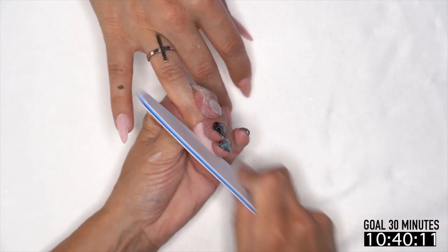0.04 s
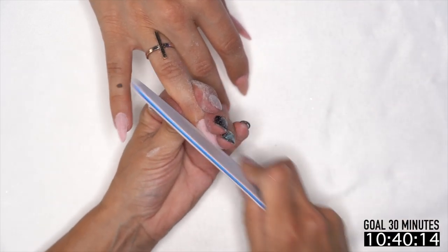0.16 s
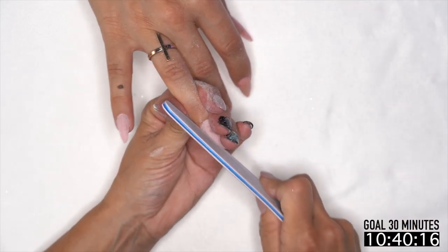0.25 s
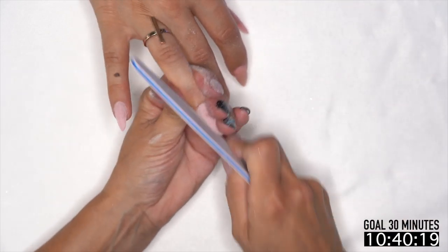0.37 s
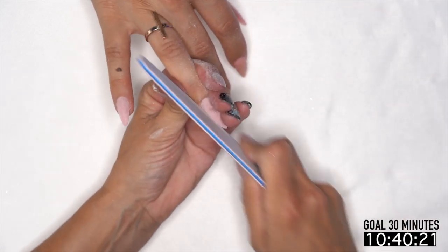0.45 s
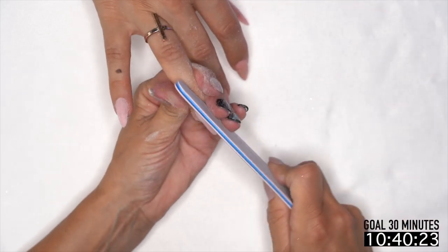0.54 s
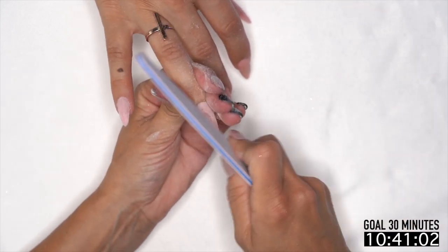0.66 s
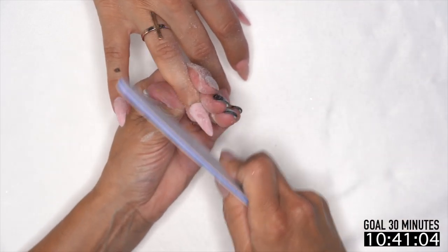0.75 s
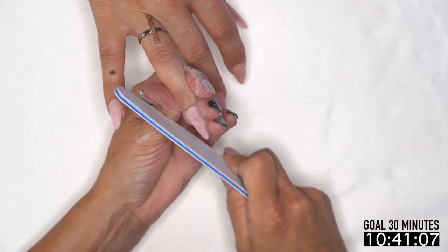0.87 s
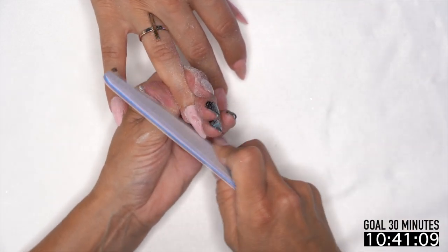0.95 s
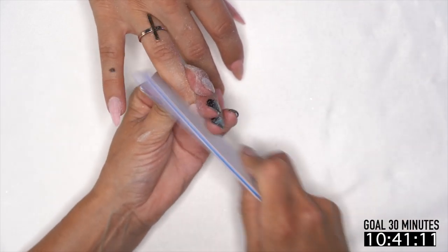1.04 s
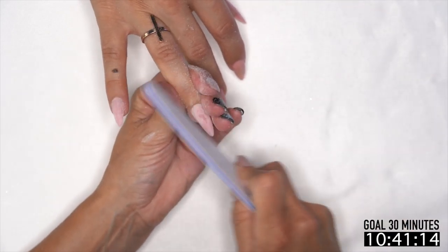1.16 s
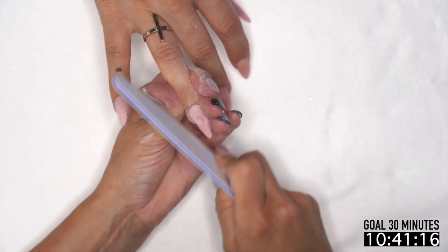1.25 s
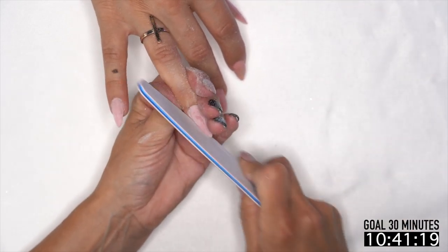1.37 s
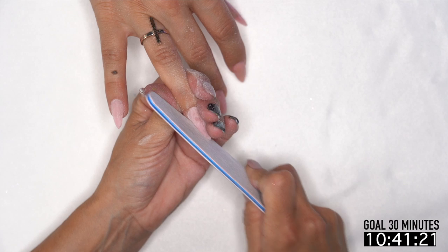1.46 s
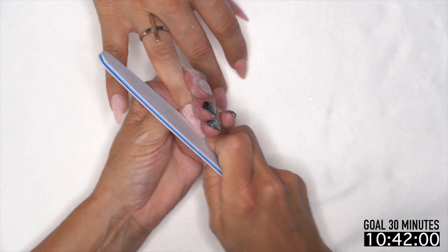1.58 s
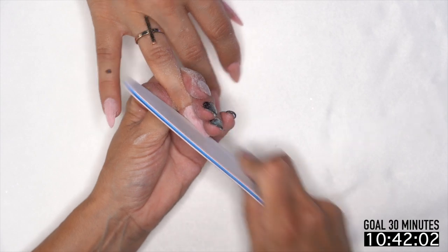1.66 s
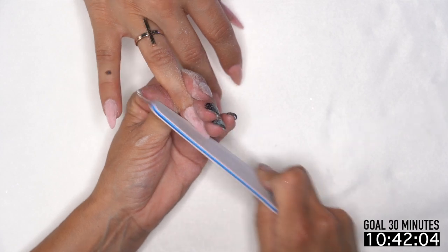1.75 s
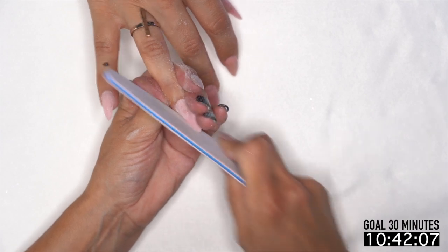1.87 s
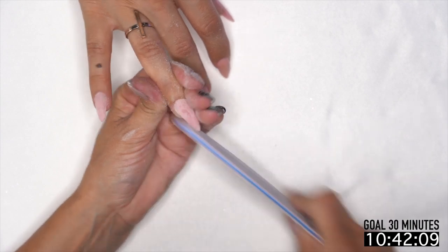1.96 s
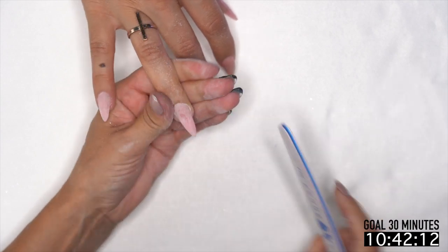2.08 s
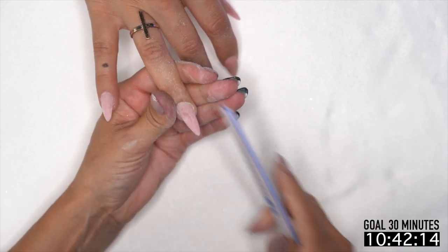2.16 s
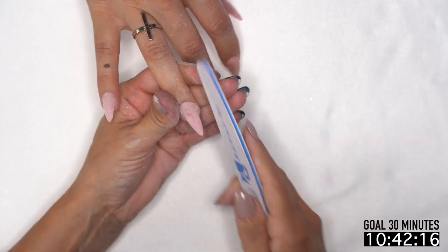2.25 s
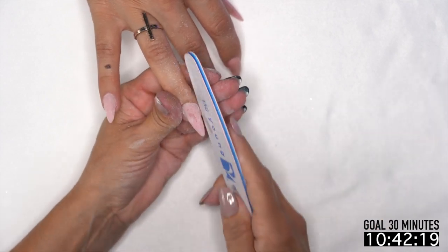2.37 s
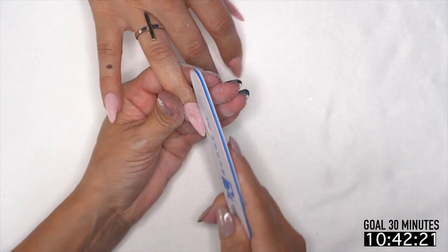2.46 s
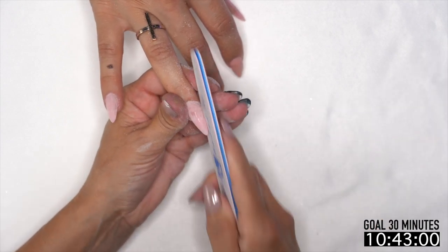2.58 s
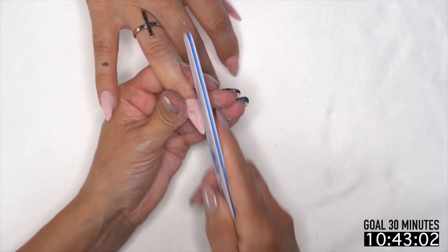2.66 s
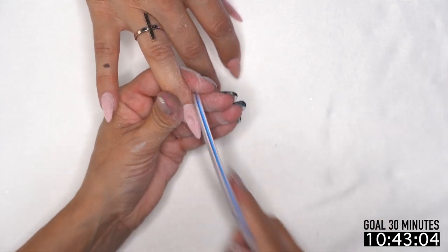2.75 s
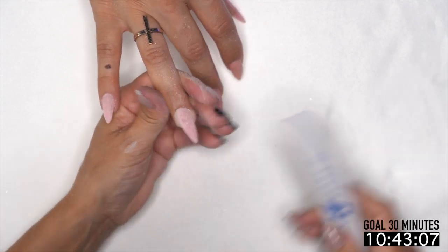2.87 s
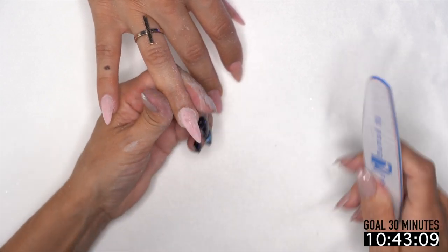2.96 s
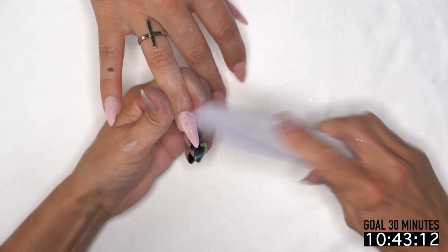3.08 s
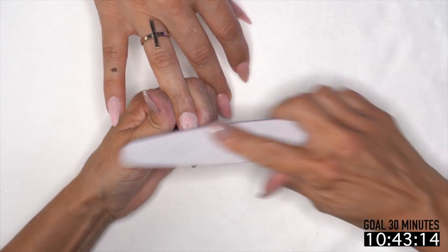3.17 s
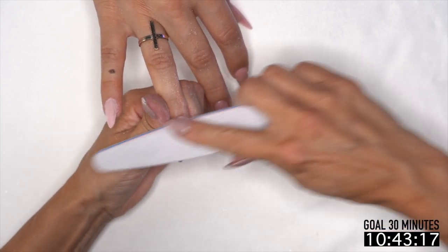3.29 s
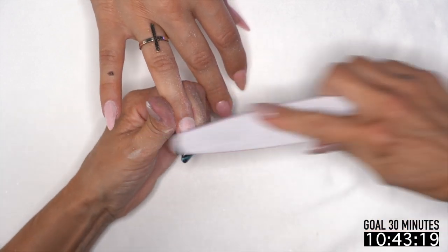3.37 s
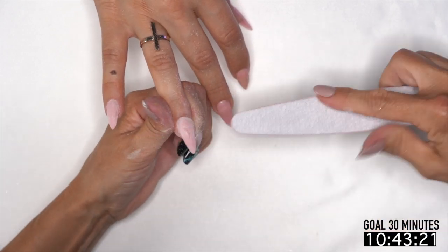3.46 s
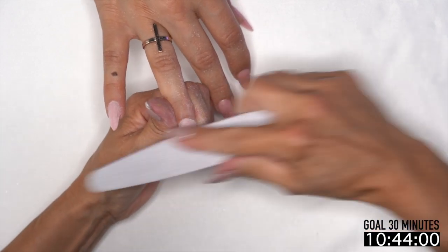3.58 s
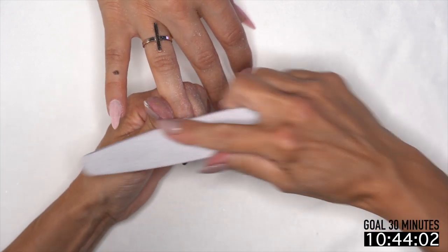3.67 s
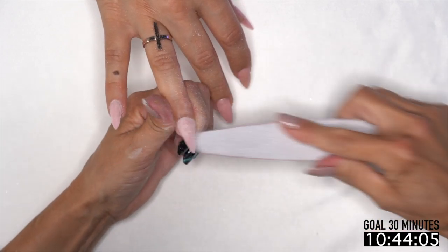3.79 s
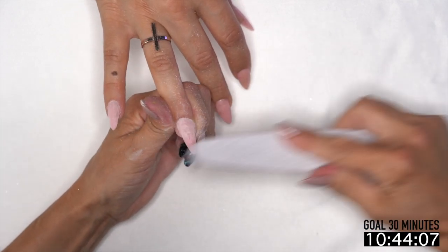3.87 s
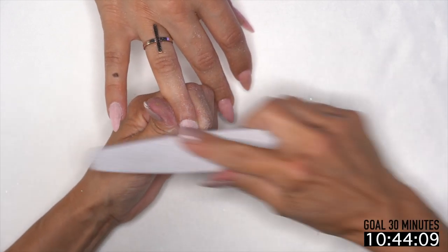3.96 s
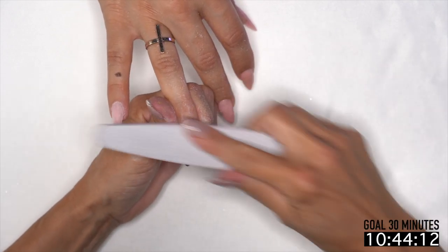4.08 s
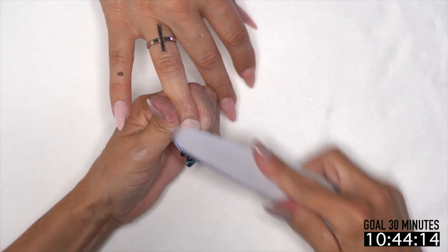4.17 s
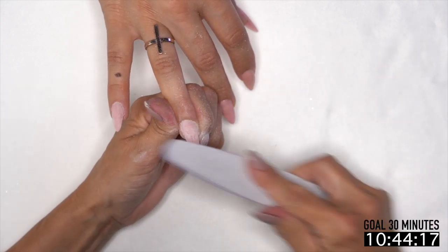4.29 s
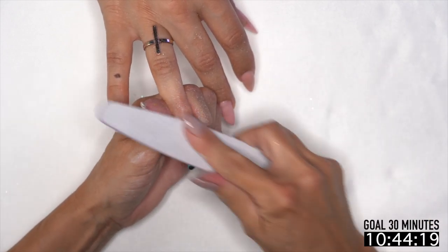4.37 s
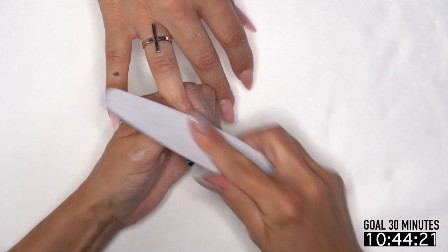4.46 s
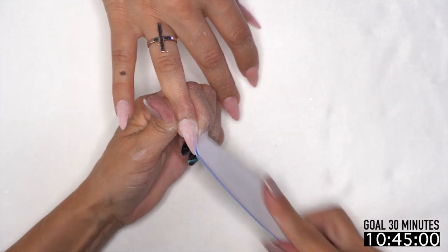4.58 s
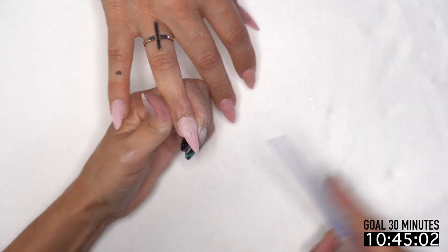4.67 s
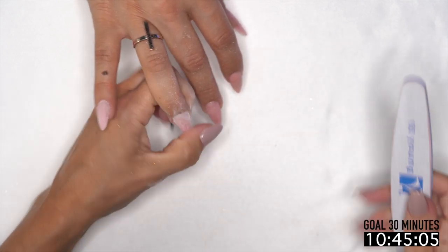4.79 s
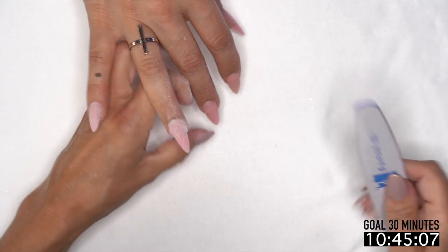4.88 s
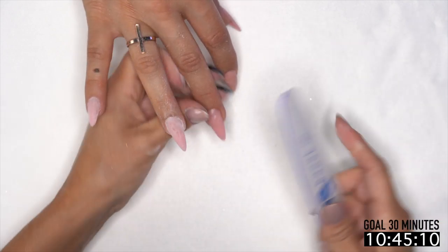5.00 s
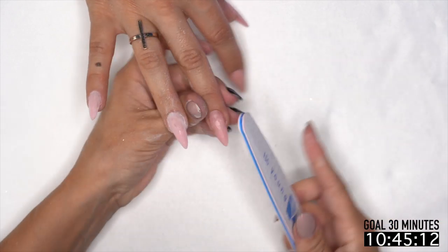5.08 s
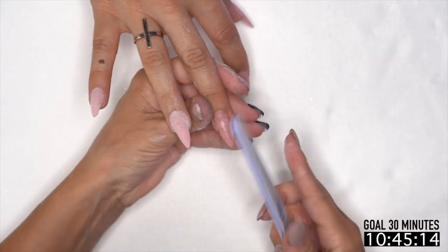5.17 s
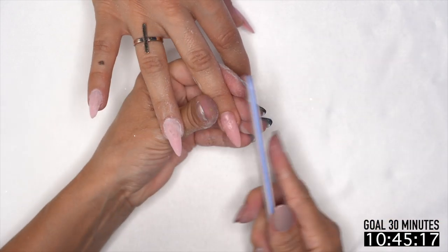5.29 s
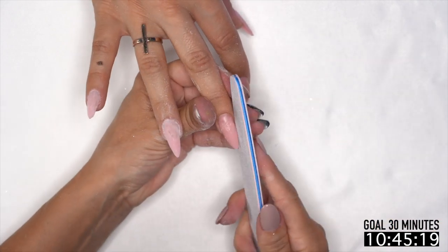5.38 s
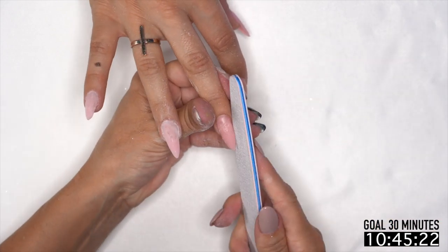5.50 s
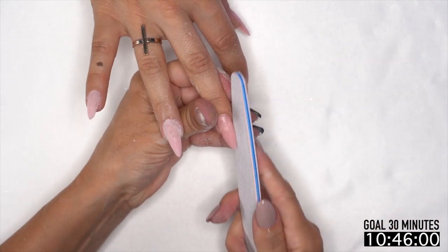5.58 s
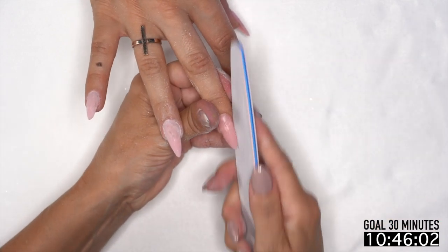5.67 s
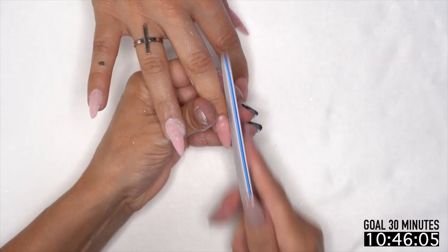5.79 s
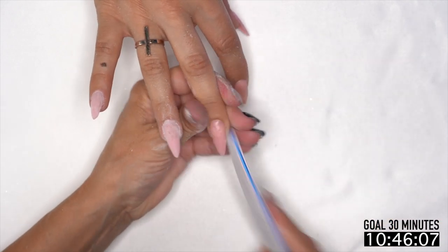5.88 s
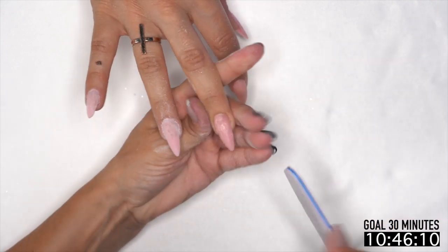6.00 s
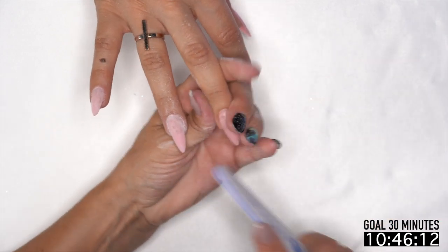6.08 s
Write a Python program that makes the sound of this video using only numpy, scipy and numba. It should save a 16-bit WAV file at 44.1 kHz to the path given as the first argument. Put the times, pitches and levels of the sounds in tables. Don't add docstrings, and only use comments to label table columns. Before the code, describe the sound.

Close, dry scratching of a fine-grit file on a gel nail, fast side strokes then longer flat pulls, above a dull fan rumble.

```python
import sys
import numpy as np
from scipy import signal
from scipy.fft import rfft, irfft
from scipy.io import wavfile
from scipy.ndimage import uniform_filter1d
from numba import njit

SR = 44100
rng = np.random.default_rng(int(sys.argv[2]) if len(sys.argv) > 2 else 0)


def wav_out(sig):
    wavfile.write(sys.argv[1], SR, np.round(np.clip(np.atleast_2d(sig).T, -1, 1) * 32767).astype(np.int16))


def rack_gain(trim_db):
    fader = np.asarray(trim_db, float)
    return 10 ** (fader / 20)


N = 270641
T = np.arange(N) / SR

# start in seconds, length in seconds,
# share of the length up to the peak speed, nail ring in dB, board level in dB against the nail.
SIDE_STROKES = [(-.082, .16, 0.47, -26.5, -18), (.091, .112, .54, -27.5, -11), (.224, .11, 0.47, -29, -18),
                (.396, 0.11, 0.37, -31, -9), (.523, 0.13, 0.32, -33, -15), (.655, .12, 0.6, -44.5, -8),
                (.972, 0.11, .5, -55.5, -11), (1.087, 0.081, 0.69, -36, -12), (1.422, 0.12, 0.5, -34, -12),
                (1.558, 0.13, 0.39, -31.5, -7), (1.696, 0.13, 0.73, -26.5, -16.5),
                (1.843, .112, 0.47, -27.5, -6.5), (1.961, .14, 0.39, -24.5, -13.5),
                (2.53, .066, 0.41, -44, -8), (2.612, 0.13, 0.69, -30.5, -5.5),
                (2.75, 0.16, 0.41, -26, -13.5), (5.685, 0.13, 0.76, -30.5, -3.5),
                (5.824, .2, 0.44, -28, -11), (6.06, 0.071, 0.32, -38.5, -10)]
# start in
# seconds, length in seconds, share up to the peak speed, nail ring in dB, board level in dB against it.
FLAT_STROKES = [
    (3.21, 0.048, .2, -36, -0.5),
    (3.261, 0.11, 0.055, -29, -11.5),
    (3.375, .19, 0.13, -24, -8),
    (3.654, 0.093, 0.11, -27.5, -5),
    (3.745, 0.21, 0.33, -26.5, -7.5),
    (4.037, 0.1, 0.12, -26.5, -9),
    (4.135, 0.2, 0.36, -28, -7.5),
    (4.434, .088, 0.16, -29.5, -6),
    (4.536, 0.2, 0.4, -28.5, -8.5),
]
# start in seconds, length in seconds, share up to the peak speed,
# nail ring in dB, board level in dB against it.
SKIN_WIPES = [(1.16, 0.061, .2, -48, -8), (2.92, .1, .1, -53, -2), (3.033, 0.05, 0.37, -45.5, -7),
              (3.116, 0.046, .11, -49.5, 3), (3.15, 0.064, .5, -54.5, 4), (4.7, 0.83, 0.19, -56, -4.5),
              (4.795, 0.062, .25, -52, -8), (4.885, 0.067, 0.39, -48, -6), (5.0, 0.049, 0.86, -44, -7),
              (5.055, 0.061, 0.81, -42.5, -8), (5.11, .07, .4, -56.5, 0), (5.215, 0.054, .3, -48.5, 4),
              (5.278, 0.055, 0.22, -56, 5), (6.0, .06, .3, -51, 4)]
# start in seconds, peak in dB, centre in Hz,
# level of the bright crack in dB against the peak, length in ms.
EDGE_TICKS = [(0.622, -6, 6000, -26, 7.3), (1.066, -21.5, 4180, -12, 4.8), (1.135, -8.5, 6300, -13, 9.3),
              (1.231, -37, 3980, 6, 11), (1.3597, -12, 5360, -9, 3.1), (1.402, -36, 2010, -8, 6.9),
              (1.612, -13, 2830, -25, 13), (1.647, -16.5, 3680, -16, 4.6), (1.863, -22, 1800, -20, 22),
              (1.904, -17, 2350, -18, 8), (3.077, -30.5, 900, -30, 14), (3.105, -31, 1020, -28, 15),
              (3.261, -32, 4500, -5, 5), (3.28, -14.5, 2600, -18, 4), (3.496, -15, 5370, -11, 4.4),
              (3.658, -22, 2950, 1, 8.1), (4.039, -11, 4770, -11, 3.3), (4.138, -27, 918, -14, 4.6),
              (4.436, -19, 2880, -12, 5.9), (5.77, -22, 800, -25, 25), (5.823, -38, 3000, -2, 6),
              (5.982, -17, 7360, 5, 7)]
# start in seconds, length in seconds, level in dB,
# centre in Hz, width in Hz.
HAND_SHAKES = [
    (0.068, 0.041, -38, 403, 230),
    (1.706, 0.053, -35.5, 273, 61),
    (2.007, 0.055, -34.5, 270, 160),
    (3.07, 0.1, -35, 358, 280),
    (3.361, .17, -31.5, 247, 143),
    (3.732, 0.27, -32.5, 188, 144),
    (4.622, 0.14, -38.5, 274, 124),
    (5.712, 0.16, -41, 510, 130),
]
RUN_OFFS = [0.62, 0.74, 2.083, 3.239, 3.505, 3.904, 4.712]

# centre in Hz, width in Hz, level in dB with the file on edge,
# level in dB with the file flat. The edge, the nail and the top hiss have the same columns.
BOARD_MODES = [(686, 220, 0, 0), (980, 386, 3.5, 6.5), (1500, 540, -1.5, 3)]
EDGE_MODES = [(1940, 430, -1.4, -16.5), (2496, 750, -1.4, -1), (3030, 315, 1, 2), (3575, 600, -1.5, -1.5)]
NAIL_MODES = [(4500, 560, -2, 1), (5084, 390, 2, 3.5), (5770, 710, -2.5, -3), (6850, 1040, -1, -0.5),
              (7950, 1050, -8, -13)]
HISS_MODES = [(10060, 3200, -0.71, -1), (11830, 2600, -1, 0.6), (14300, 5700, -2.2, -1)]
PARTS = (NAIL_MODES, BOARD_MODES, EDGE_MODES, HISS_MODES)

# level in dB against the nail ring, share of the stroke's
# board dB, power of the speed, dB per dB of stroke strength. Flat strokes and skin have the same columns.
SIDE_LAW = [
    (0.5, 0, 1.08, 0),
    (0.5, 1, 0.84, 0),
    (0.65, 0.43, 0.81, 0.04),
    (0.5, 0, 1.41, -0.04),
]
FLAT_LAW = [
    (0, 0, 1.2, 0.044),
    (-.5, 1, 0.88, 0),
    (-2.5, 0.32, 0.95, 0.043),
    (2.05, 0.036, 1.9, .3),
]
SKIN_LAW = [
    (0, 0, 1.3, 0),
    (-.5, .9, 2, 0),
    (0, .45, 1.3, 0.0022),
    (-4.5, 0.3, 1.8, .01),
]
# start in seconds, edge in dB, hiss in dB.
GRIP_CHANGES = [(-.1, -1, 0), (.65, 0.5, 3), (.95, 5, 0), (1.4, 3, -0.5), (1.69, -3, 1.5), (1.84, 1, -2.5),
                (2.5, -1.5, -1), (2.74, -3.5, 1.5), (3.2, 4, -5.5), (3.37, 1, -1.5), (3.65, 0, 0),
                (4.13, -0.5, 3.5), (4.43, -1, 0.5), (4.53, -2.5, 2.5), (4.75, 2, 3.5), (5.6, -3, -1),
                (5.82, -2, 1), (6.05, 0, -5)]

# frequency in Hz, level in dB, wander in Hz.
FAN_LINES = [(30.7, -47.5, 1.8), (57.9, -47, 4.97), (87.5, -44.5, 1.47), (120.2, -43, 1.6),
             (388, -62, 2.45)]
# frequency in Hz, density in dB per Hz.
AIR_SPECTRUM = [(12, -41), (20, -13.5), (70, -8), (91, -11), (163, -9.5), (182, -14.5), (228, -13),
                (285, -14), (377, -18), (410, -27), (624, -22.5), (718, -32), (6540, -44), (8890, -45),
                (16000, -49.5)]
# time in seconds, level in dB.
BACKGROUND_SWELL = [(0, -3.5), (1.5, -0.5), (3, 1.5), (4.5, 2.5), (6.14, 2.5)]
# centre in Hz, reverberation time T60 in seconds, level in dB.
ROOM_BANDS = [(495, 0.42, -43), (1620, 0.46, -37), (3640, 0.62, -33), (8660, 0.41, -29.5), (14000, .3, -45),
              (7000, 0.08, -32)]

FLAT_FROM_S, FLAT_TO_S = 2.95, 4.75
FIRM_DB = -28
BITE, BITE_S = 0.15, 0.00088


def unit(x):
    return x / np.sqrt(np.mean(x ** 2))


def steady(hz, n):
    return np.full(n, float(hz))


@njit
def svf(x, hz, width):
    y, b, l = np.empty(len(x)), 0., 0.
    for i in range(len(x)):
        g, k = np.tan(np.pi * hz[i] / SR), width / hz[i]
        v = (b + g * (x[i] - l)) / (1 + g * (g + k))
        b, l, y[i] = 2 * v - b, l + 2 * g * v, k * v
    return y


def steep_resonance(x, centre, width, second_width):
    return svf(svf(x, centre, float(width)), centre, float(second_width))


def walk(rate):
    hold = int(SR / rate)
    levels = np.repeat(rng.standard_normal(N // hold + 1), hold)
    return 1.26 * uniform_filter1d(uniform_filter1d(levels, hold), hold)[:N]


def speed(s, length, peak, bite=0):
    u, peak = (T - s) / length, np.clip(peak, .02, .98)
    jerk = np.clip((T - s) / BITE_S, 0, 1)
    up = bite * jerk + (1 - bite) * np.sin(np.pi / 2 * np.clip(u / peak, 0, 1))
    return up * np.sin(np.pi / 2 * np.clip((1 - u) / (1 - peak), 0, 1))


def fan():
    hz = np.maximum(np.fft.rfftfreq(N, 1 / SR), 1)
    air_hz, air_db = np.transpose(AIR_SPECTRUM)
    colour = rack_gain(np.interp(np.log(hz), np.log(air_hz), air_db))
    out = rack_gain(-41) * unit(irfft(rfft(rng.standard_normal(N)) * colour, N))
    for f, db, wander_hz in FAN_LINES:
        phase = 2 * np.pi * np.cumsum(f + wander_hz * walk(12)) / SR
        out += np.sqrt(2) * rack_gain(db + 1.7 * walk(6.6)) * np.sin(phase)
    return out * rack_gain(np.interp(T, *np.transpose(BACKGROUND_SWELL)))


def room(x):
    t, tail = np.arange(SR) / SR, 0
    for hz, t60, db in ROOM_BANDS:
        noise = svf(rng.standard_normal(SR), steady(hz, SR), 0.64 * hz)
        band = noise * 1000. ** (-t / t60) * (t > .004)
        tail = tail + rack_gain(db) * band / np.sqrt(np.sum(band ** 2) * hz / SR)
    return signal.fftconvolve(x, tail)[:N]


def shakes():
    push, out = rng.standard_normal(N) * rack_gain(3.9 * walk(50)), 0
    for s, length, db, hz, width in HAND_SHAKES:
        rumble = unit(steep_resonance(push, steady(hz, N), width, 2 * width))
        out = out + rack_gain(db) * speed(s, length, peak=0.32) * rumble
    return out


def grit(per_s, spread_db, patchy_db):
    slips = (rng.random(N) < per_s / SR) * rng.standard_normal(N)
    patches = walk(350) + .45 * walk(90)
    return unit(slips * rack_gain(spread_db * rng.exponential(size=N) + patchy_db * patches))


def ring(x, modes, drift, flicker_db):
    out, flat = 0, (T > FLAT_FROM_S) & (T < FLAT_TO_S)
    for hz, width, edge_db, flat_db in modes:
        centre = np.minimum(hz * (1 + drift * walk(14)), .45 * SR)
        level_db = np.where(flat, flat_db, edge_db) + flicker_db * walk(18)
        kicks = x * rng.choice([-1., 1.], N) * rack_gain(level_db)
        out = out + steep_resonance(kicks, centre, width, 2 * width)
    return unit(out)


def gains(rows, law, bite=BITE):
    out = np.zeros((len(law), N))
    for s, length, peak, db, board_db in rows:
        v = speed(s, length, peak, bite)
        grip = [row for row in GRIP_CHANGES if row[0] < s + length / 2][-1]
        grip_db = (0, 0, *grip[1:])
        for off in RUN_OFFS:
            if s + peak * length < off < s + length:
                v = v * np.exp(-np.maximum(T - off, 0) / .004)
        for k, (part_db, share, power, slope) in enumerate(law):
            level_db = db + part_db + grip_db[k] + share * board_db + slope * (db - FIRM_DB)
            out[k] += rack_gain(level_db) * v ** power
    return out


def wipes():
    rub = grit(per_s=14000, spread_db=0.7, patchy_db=1.4)
    bodies = [ring(rub, modes, drift=0.045, flicker_db=2.3) for modes in PARTS]
    return np.sum(gains(SKIN_WIPES, SKIN_LAW, bite=.05) * bodies, axis=0)


def ticks():
    out, t = np.zeros(N), np.arange(2000) / SR
    for s, db, hz, top_db, ms in EDGE_TICKS:
        knock_db = -11.5 - 0.28 * (db + 20)
        fade = np.exp(-t / (0.00065 * ms))
        chatter = rng.standard_normal(len(t)) * fade * np.minimum(t / (1e-4 * ms), 1)
        chatter[8] -= 13.0 * np.exp(-ms / 4.5)
        i = int(s * SR)
        layers = ((chatter, hz, 0.47 * hz, 0),
                  (chatter * fade, 11500, 7000, top_db),
                  (chatter, 2000, 2400, knock_db))
        for push, centre, width, part_db in layers:
            part = steep_resonance(push, steady(centre, len(t)), width, 7.4 * width)
            out[i:i + len(t)] += rack_gain(db + part_db) * part / abs(part).max()
    return out


def file_strokes():
    slips = grit(per_s=16000, spread_db=1.28, patchy_db=1.5)
    pressure = gains(SIDE_STROKES, SIDE_LAW) + gains(FLAT_STROKES, FLAT_LAW)
    bodies = [ring(slips, modes, drift=0.035, flicker_db=2.5) for modes in PARTS]
    rasp = np.sum(pressure * bodies, axis=0)
    snags = -rack_gain(1.0 * rng.exponential(size=N)) * (rng.random(N) < 160 / SR)
    return rasp + rack_gain(-12) * pressure[0] * unit(svf(snags, steady(4500, N), 6400.0))


def scene():
    table = file_strokes() + wipes() + ticks() + shakes()
    return (table + room(table) + fan())[None]


def top_cut(x):
    return signal.sosfilt(signal.butter(12, 17010, fs=SR, output="sos"), x)


def record(dry):
    low_pass = signal.ellip(12, .2, 62, 15800, fs=SR, output="sos")
    mix = signal.sosfilt(low_pass, dry)
    return top_cut(mix)


dry = scene()
out = record(dry)
wav_out(out)
```